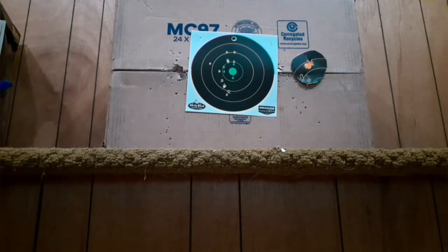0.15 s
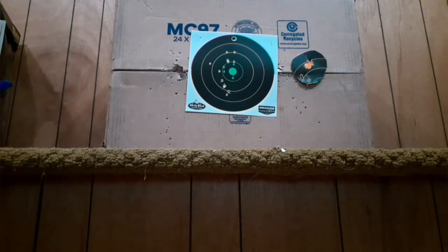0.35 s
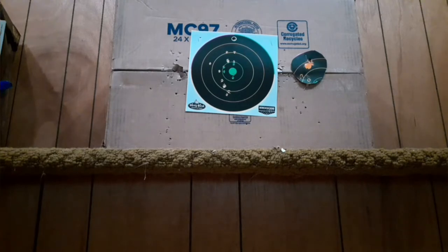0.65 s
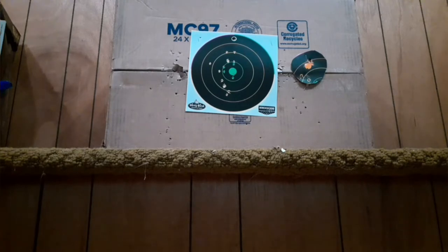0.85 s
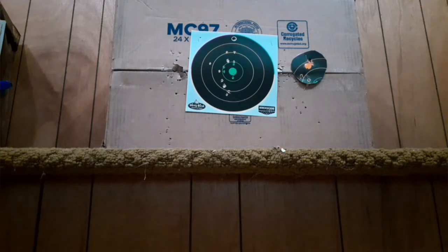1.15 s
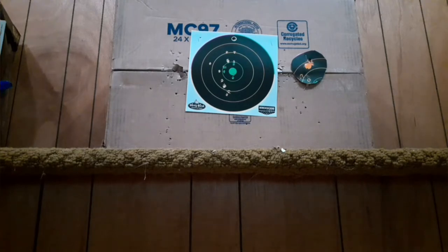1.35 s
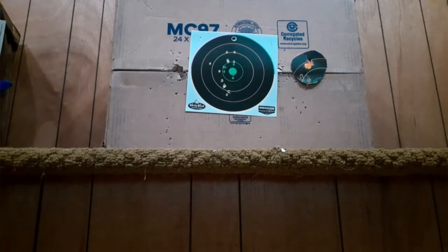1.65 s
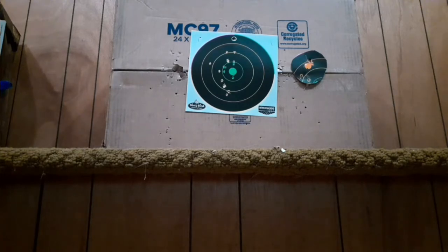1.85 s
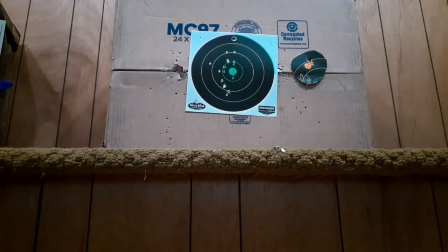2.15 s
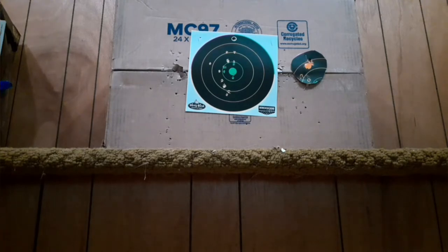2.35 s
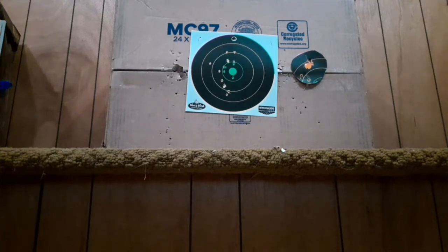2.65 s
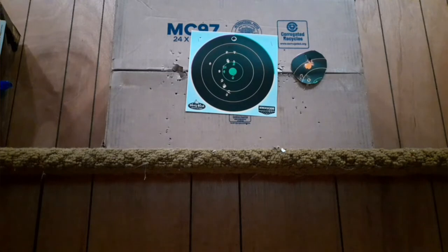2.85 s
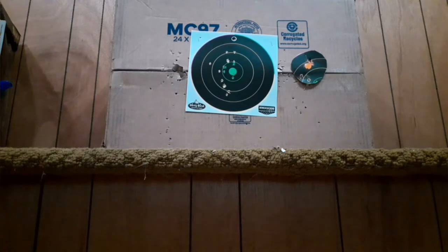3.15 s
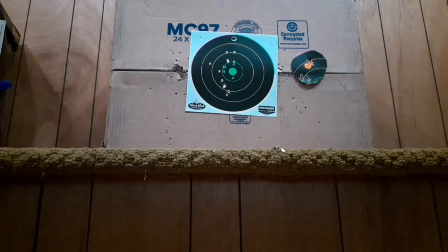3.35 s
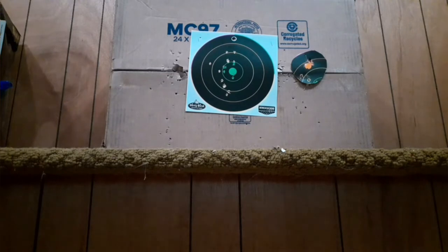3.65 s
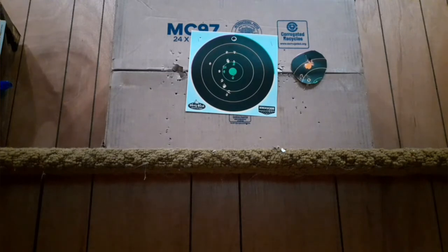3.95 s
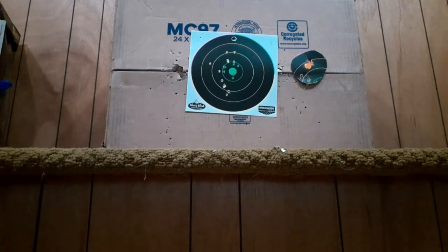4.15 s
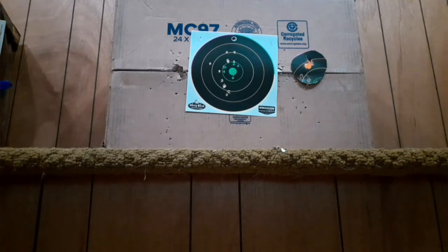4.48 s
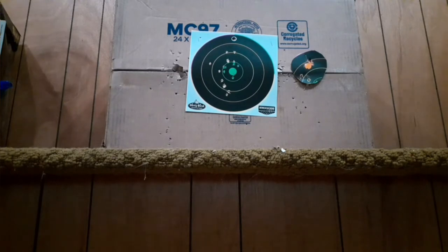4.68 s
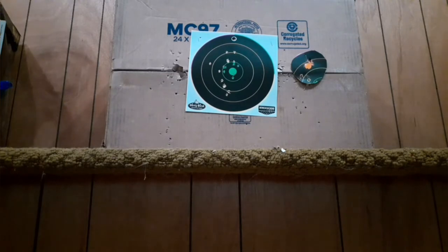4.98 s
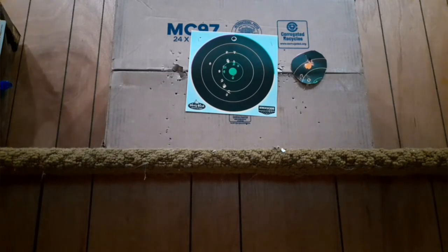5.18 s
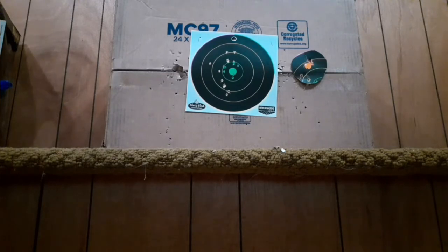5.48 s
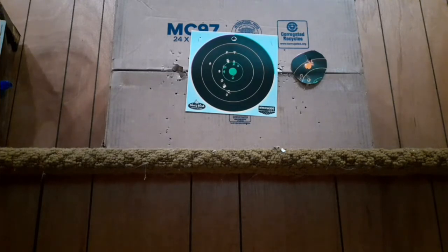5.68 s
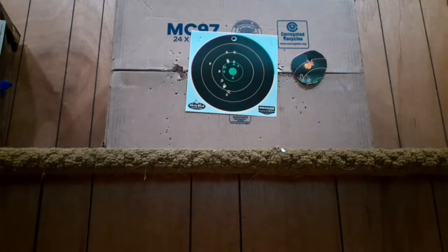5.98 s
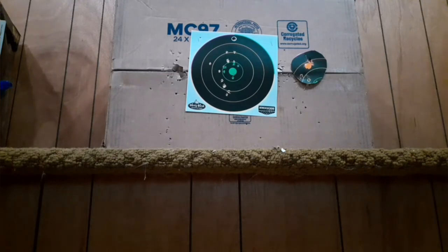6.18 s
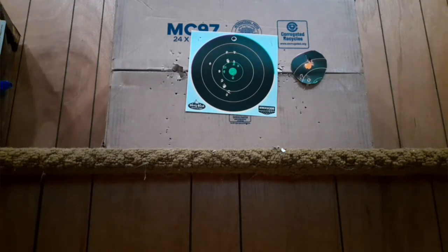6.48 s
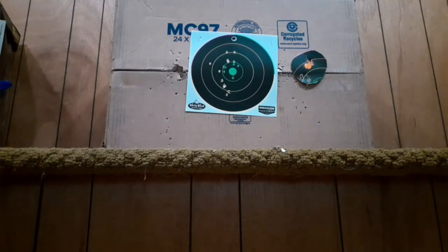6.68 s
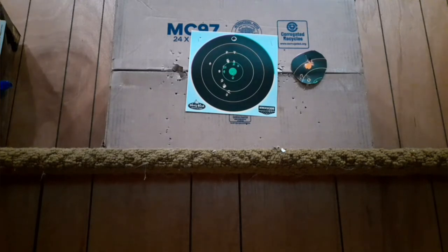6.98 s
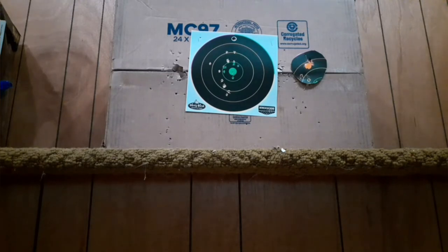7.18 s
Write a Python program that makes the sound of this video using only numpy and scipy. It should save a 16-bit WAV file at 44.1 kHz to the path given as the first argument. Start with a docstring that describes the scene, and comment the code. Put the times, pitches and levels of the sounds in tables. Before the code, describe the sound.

Over a steady low ventilation hum, an air revolver fires three spaced shots, pellets slapping cardboard, its hammer clicking back after each one.

```python
"""A ventilation fan hums throughout, built from tones and filtered noise, under a faint electronic hiss and whine.
A CO2 revolver then fires three BBs across a wood-panelled room at a cardboard target near the camera.
Each shot is steel clicks, a muzzle pop and a jet of gas, then a slap on the cardboard, all made of shaped noise.
The camera's gain control ducks at each shot and lets the hum swell back slowly.
Half a second or more after each shot the hammer is cocked with two steel clicks that ring the frame."""
import sys
import numpy as np
from scipy import signal
from scipy.fft import rfft, irfft, next_fast_len
from scipy.io import wavfile
from scipy.ndimage import uniform_filter1d, minimum_filter1d, map_coordinates

SR = 44100
rng = np.random.default_rng(int(sys.argv[2]) if len(sys.argv) > 2 else 0)


def transcribe(signal):
    """Save signal, clipped to [-1, 1], as a 16-bit WAV file at the path in sys.argv[1]."""
    frames = np.atleast_2d(signal).T
    limited = np.clip(frames, -1, 1)
    pcm = np.round(limited * 32767).astype(np.int16)
    wavfile.write(sys.argv[1], SR, pcm)


N = 322978
TIME = np.arange(N) / SR  # seconds through the scene
AGE = TIME[:SR]  # seconds since a short sound began
# Tone colour of the locking steel parts: (frequency [Hz], relative level [dB])
LOCK_STEEL = [(400, -28.5), (700, -15), (1100, -16.5), (1800, -14), (2350, -8), (2900, -9), (3700, -5.5),
              (6000, -6.5), (8000, -8), (11500, -4.5), (16000, -2)]


def amp(db):
    """Turn decibels into a gain."""
    return 10 ** (np.asarray(db) / 20)


def unit(x):
    """Scale to an average (rms) level of 1."""
    return x / np.sqrt(np.mean(x ** 2) + 1e-20)


def along(points, hz):
    """Read a curve of (frequency, value) points on a logarithmic frequency axis."""
    point_hz, value = np.transpose(points)
    return np.interp(np.log(hz + 1), np.log(point_hz + 1), value)


def filtered(x, response):
    """Multiply the spectrum of x by a gain that depends on frequency."""
    size = x.shape[-1]
    padded = next_fast_len(size + SR // 2)
    spectrum = rfft(x, padded) * response(np.fft.rfftfreq(padded, 1 / SR))
    return irfft(spectrum, padded)[..., :size]


def coloured(x, spectrum):
    """Give x a tone colour with a filter of unit energy that never sounds ahead of its input."""
    size = 8192
    gain = amp(along(spectrum, np.fft.rfftfreq(size, 1 / SR)))
    # Folding the cepstrum puts the whole response after time zero
    cepstrum = irfft(np.log(gain))
    cepstrum[1:size // 2] *= 2
    cepstrum[size // 2 + 1:] = 0
    kernel = irfft(np.exp(rfft(cepstrum)))
    kernel /= np.linalg.norm(kernel)
    return signal.fftconvolve(x, kernel)[:len(x)]


def noise(spectrum, channels):
    """Make steady coloured noise of rms 1, unrelated between channels."""
    white = rng.standard_normal((channels, N))
    return unit(filtered(white, lambda hz: amp(along(spectrum, hz))))


def wobble(rate):
    """Draw a smooth random curve over the whole scene, with rate random points a second."""
    return map_coordinates(rng.standard_normal(8000), [TIME * rate], mode="mirror")


def leaning(x, side):
    """Tilt the stereo image by a left-minus-right level difference at each frequency."""
    return filtered(x, lambda hz: amp(np.outer([.5, -.5], along(side, hz))))


def burst(envelope):
    """Shape noise by an envelope and scale it to unit energy."""
    x = envelope * rng.standard_normal(len(envelope))
    return x / np.linalg.norm(x)


def blow(t60, rough):
    """Mix a one-sample impulse with a fading turbulent burst, which holds the share rough of the energy."""
    rough = np.clip(rough, 0, 1)
    impulse = np.sqrt(1 - rough) * (AGE == 0)
    turbulent = np.sqrt(rough) * burst(amp(-60 * AGE / t60))
    return impulse + turbulent


def in_room(x, wet_db, near_s, life):
    """Add sharp echoes from floor and near walls, then a fading tail, at each of two microphones."""
    # How long the room rings, before life scales it: (frequency [Hz], time to fade by 60 dB [s])
    ring_times = [(60, .2), (170, .23), (350, .37), (700, .44), (2000, .48), (4300, .5), (7500, .38),
                  (11000, .31), (16000, .25)]
    hz, t, bins = signal.stft(rng.standard_normal((2, SR)), SR, nperseg=256)
    fade = amp(-60 * t / (life * along(ring_times, hz)[:, None]))
    tail = signal.istft(bins * fade, SR, nperseg=256)[1][:, :SR]
    tail *= 1 - np.exp(-AGE / 0.0036)  # the reflections thicken
    # Random spikes, thinning in strength over near_s seconds
    near = np.array([burst(np.exp(-AGE / near_s) * (rng.random(SR) < .12)) for _ in range(2)])
    direct = 0.26 * (AGE == 0)
    response = direct + near + amp(wet_db) * tail / np.linalg.norm(tail[0])
    response /= np.linalg.norm(response[0])
    return signal.fftconvolve(x[None], response, axes=1)[:, :SR]


def add(track, s, sound):
    """Mix a sound into the track at s seconds."""
    part = track[:, round(s * SR):][:, :SR]
    part += sound[:, :part.shape[1]]


def fan():
    """Motor tones and duct rumble reach both microphones alike; rushing air is partly diffuse; flow sways all."""
    # Motor tones: (frequency [Hz], level [dB])
    motor_tones = [(79.5, -45.5), (119.3, -41), (269, -67), (414, -61.5), (538, -69.5)]
    # Duct rumble: (frequency [Hz], relative level [dB])
    rumble_colour = [(15, -47.5), (30, -26.5), (48, -13.5), (58, 0.5), (68, 0), (79, 7), (92, -1.5),
                     (110, -5.5), (135, -2), (165, -11.5), (260, -59)]
    # Rushing air: (frequency [Hz], relative level [dB])
    air_colour = [(90, -18), (170, 4), (300, 0), (420, 1), (510, -10), (620, -10), (720, -15.5), (840, -14),
                  (1100, -34), (2000, -39.5), (5000, -62.5)]
    rumble_db, air_db = -41, -50
    low_sway_db, air_sway_db = 1.83, 0.93  # how far the bass and the rush follow the flow
    flow = wobble(6.0)
    hum = 0
    for hz, db in motor_tones:
        phase = 2 * np.pi * hz * TIME + 0.71 * wobble(7.4)
        hum = hum + amp(db) * np.sqrt(2) * np.sin(phase)
    rumble = amp(rumble_db) * noise(rumble_colour, channels=1)
    low = amp(low_sway_db * flow) * (hum + rumble)
    rush = unit(noise(air_colour, channels=2) + 1.1 * noise(air_colour, channels=1))
    return low + amp(air_db + air_sway_db * flow) * rush


def electronics():
    """The camera's own faint hiss, with wavering narrow noise bands as whistles and a fluttering whine of tones."""
    # Hiss: (frequency [Hz], relative level [dB])
    hiss_colour = [(500, 1.5), (1200, 0.5), (2100, -4.5), (2800, 1), (4000, -4.5), (4700, -13.5),
                   (5800, -3.5), (7400, -8.5), (8700, -0.5), (10500, -5), (12500, 0), (16000, -4)]
    # Narrow bands in the hiss: (centre frequency [Hz], width [Hz], level [dB])
    whistles = [(1560, 150, -80), (2610, 110, -84), (3780, 60, -83.5), (5545, 90, -85.5),
                (8330, 160, -80.5), (12000, 300, -85.5)]
    # Thin electrical whine, its top lines a buzz rate apart: (frequency [Hz], relative level [dB])
    whine_tones = [(1533, -78), (3777, -87), (8199, -84), (8258, -80), (8317, -84), (8376, -80)]
    hiss = amp(-68.0) * noise(hiss_colour, channels=2)
    for centre, width, db in whistles:
        white = rng.standard_normal((2, N))
        band = unit(filtered(white, lambda hz: 1 / (1 + (2 * (hz - centre) / width) ** 2)))
        hiss += amp(db + 1.8 * wobble(9.9)) * band
    whine = 0
    for hz, db in whine_tones:
        flutter = amp(db + 1.8 * wobble(40))
        whine = whine + flutter * np.sin(2 * np.pi * hz * TIME + 0.36 * wobble(20))
    return hiss + amp(4.0) * whine


def shots():
    """The sear slips, the hammer hits the valve, gas pops and vents briefly, and the BB slaps the cardboard."""
    # Shots: (time [s], relative pop level [dB], relative low push level [dB], relative gas jet level [dB],
    # delay until the BB strikes [s], relative strike level [dB])
    firings = [(1.2555, -1.5, -8, -3, .022, -6), (3.9719, -2.5, 0, -3, .031, -9),
               (6.293, -4, -11, -5, 0.026, -6.5)]
    # Tone colours of hammer and pop, shoved air, gas jet, cardboard: (frequency [Hz], relative level [dB])
    pop_colour = [(25, -19.5), (90, -6.5), (200, -4), (550, -4), (850, -9.5), (1600, -8.5), (3500, -13),
                  (7000, -17), (13000, -11.5), (16000, -15)]
    push_colour = [(25, -21.5), (80, 1), (170, -1), (240, -0.5), (400, -11), (900, -27), (3000, -48.5)]
    jet_colour = [(100, -33.5), (250, -14.5), (480, 1), (800, -9), (1500, -8), (2500, -4), (4300, 2),
                  (6500, -4.5), (8200, -2), (10000, -7), (13000, -1.5), (16000, -4.5)]
    cardboard_colour = [(25, -21), (100, 1.5), (330, -3), (800, -10), (1500, -9.5), (4000, -15),
                        (16000, -27.5)]
    rise_s, shut_s = .014, .082
    valve = (1 - np.exp(-AGE / rise_s)) / (1 + (AGE / shut_s) ** 10)  # the flow builds, then the valve shuts
    out = np.zeros((2, N))
    for s, pop_db, push_db, jet_db, flight_s, strike_db in firings:
        sear = coloured(blow(t60=.008, rough=1.0), LOCK_STEEL)
        add(out, s - .012, amp(2.0) * in_room(sear, wet_db=7, near_s=0.0072, life=1.0))

        hammer = coloured(blow(t60=0.0039, rough=0.96), pop_colour)
        add(out, s - .003, amp(17) * in_room(hammer, wet_db=4.0, near_s=0.013, life=0.36))

        pop = coloured(-blow(t60=0.004, rough=.16), pop_colour)
        add(out, s, amp(pop_db + 37.0) * in_room(pop, wet_db=-1, near_s=0.004, life=0.98))
        # Slap from the far wall
        add(out, s + .019, amp(pop_db + 28.5) * in_room(pop, wet_db=-5.5, near_s=0.0017, life=1.0))

        # The air that the gas shoves aside
        push = coloured(-blow(t60=0.0051, rough=0.0072), push_colour)
        add(out, s + 0.00082, amp(push_db + 32.5) * in_room(push, wet_db=-2, near_s=0.0024, life=.9))

        turbulence = amp(1.9 * wobble(350)[:SR])
        jet = coloured(burst(valve * turbulence), jet_colour)
        add(out, s, amp(jet_db + 38.5) * in_room(jet, wet_db=13.5, near_s=0.0032, life=0.94))

        strike = coloured(-blow(t60=0.0036, rough=.5), cardboard_colour)
        add(out, s + flight_s, amp(strike_db + 26.5) * in_room(strike, wet_db=1.5, near_s=0.0077, life=1.0))
    return out


def cocking(clicks, steel, gain_db, second_s, second_db, rattle_db, ring_hz, ring_db):
    """Each click is two quick steel contacts among tiny rattles; they ring the frame, heard mostly via the room."""
    out = np.zeros((2, N))
    ring = np.sin(2 * np.pi * ring_hz * AGE) * amp(-60 * AGE / 0.26)
    ring /= np.linalg.norm(ring)
    for s, db in clicks:
        for delay, contact_db in [(0, 0), (second_s, second_db)]:
            # About 400 tiny knocks a second, dying away
            rattle = burst(np.exp(-AGE / 0.017) * (rng.random(SR) < 400 / SR))
            contact = coloured(blow(t60=0.027, rough=0.74) + amp(rattle_db) * rattle, steel)
            contact += amp(ring_db) * ring
            heard = in_room(contact, wet_db=3.5, near_s=0.0084, life=0.8)
            add(out, s + delay, amp(db + gain_db + contact_db) * heard)
    return out


def scene():
    """Place the revolver a little to the left over a steady background that leans further left."""
    # The hammer is drawn and the cylinder starts to turn: (time [s], relative level [dB])
    draw_clicks = [(2.184, -32.5), (4.4955, -31), (6.8445, -33.5)]
    # Hammer and cylinder lock: (time [s], relative level [dB])
    lock_clicks = [(2.3035, -31), (4.626, -29.5), (6.948, -30)]
    # Tone colour of the steel as the hammer is drawn: (frequency [Hz], relative level [dB])
    draw_steel = [(400, -21.5), (700, -18.5), (1100, -21.5), (2400, -13.5), (3100, -18), (4000, -4.5),
                  (5500, -10.5), (7000, -8), (8500, -1.5), (10500, -10), (13700, -3), (16000, -7.5)]
    # Stereo lean of revolver and background: (frequency [Hz], left minus right level [dB])
    gun_side = [(60, -1), (180, -.5), (380, 3), (1300, 6), (4400, 2), (8000, 5), (15000, 7.5)]
    floor_side = [(60, 5), (400, 8.5), (1300, 12.5), (3000, 7.5), (8200, 14), (15000, 11)]
    background = leaning(fan() + electronics(), floor_side)
    draws = cocking(draw_clicks, draw_steel, gain_db=33.5, second_s=.011, second_db=5.5,
                    rattle_db=-6.0, ring_hz=3773, ring_db=-17.5)
    locks = cocking(lock_clicks, LOCK_STEEL, gain_db=36.5, second_s=0.0067, second_db=-0.5,
                    rattle_db=-11.5, ring_hz=3560, ring_db=-22.5)
    return leaning(shots() + draws + locks, gun_side) + background


def gain_control(x, limit_db, hold_s, release_db, start_db):
    """Turn down above the limit, hold, then recover by release_db each second; it starts start_db down."""
    power = np.abs(uniform_filter1d(np.mean(x ** 2, axis=0), size=1100))  # averaged over 25 ms
    excess = np.maximum(10 * np.log10(power + 1e-12) - limit_db, 0)
    hold = int(abs(hold_s) * SR) // 2
    held = -minimum_filter1d(-excess, 2 * hold + 1, origin=hold)  # largest excess of the past hold_s
    # A running maximum on a rising ramp gives a cut that falls at a steady rate
    ramp = release_db * TIME
    cut = np.maximum.accumulate(np.maximum(held + ramp, start_db)) - ramp
    return x * amp(-uniform_filter1d(cut, size=64))


def record(dry):
    """The camera rides the gain, rounds off the highest peaks and cuts steeply above its band limit."""
    top_hz = 15850
    x = gain_control(dry, limit_db=-9.5, hold_s=0.96, release_db=10.0, start_db=8.5)
    x = x / (1 + x ** 6) ** (1 / 6)
    return filtered(x, lambda hz: 1 / (1 + (hz / top_hz) ** 140))


dry = scene()
out = record(dry)
transcribe(out)
```